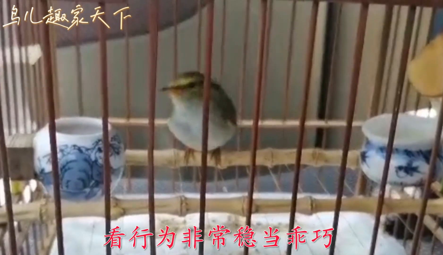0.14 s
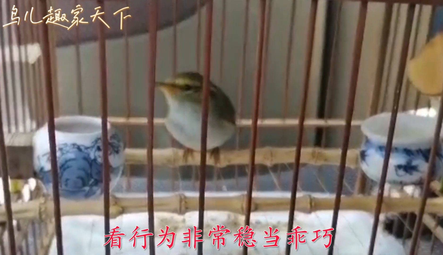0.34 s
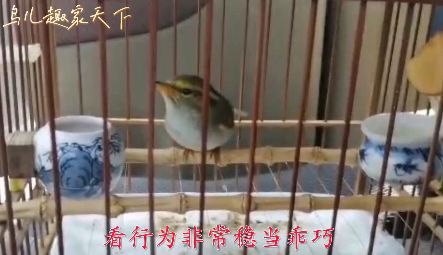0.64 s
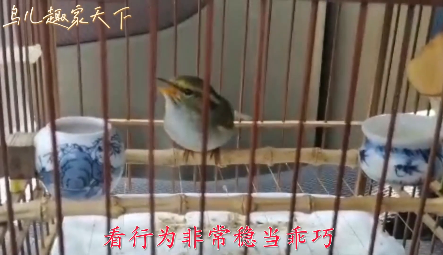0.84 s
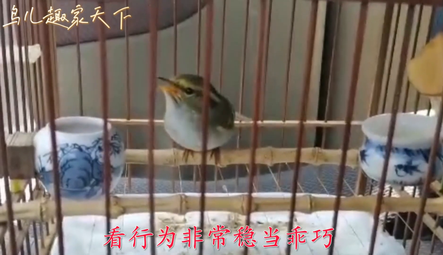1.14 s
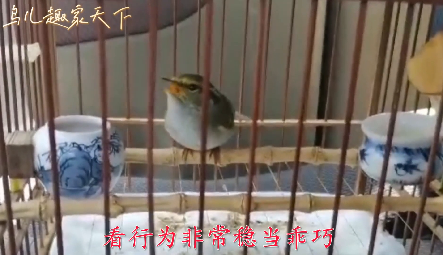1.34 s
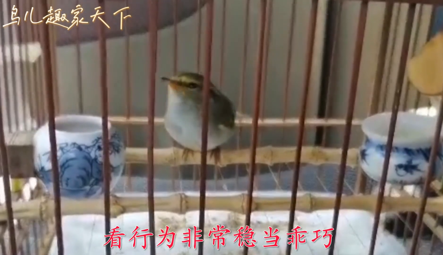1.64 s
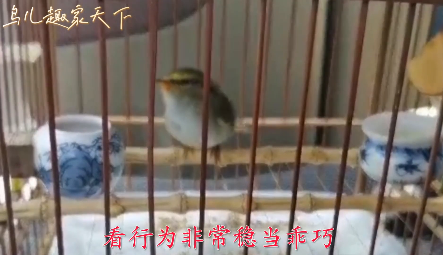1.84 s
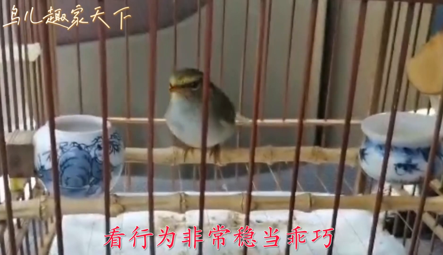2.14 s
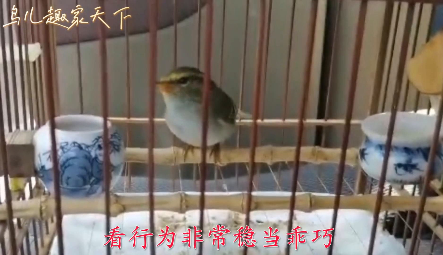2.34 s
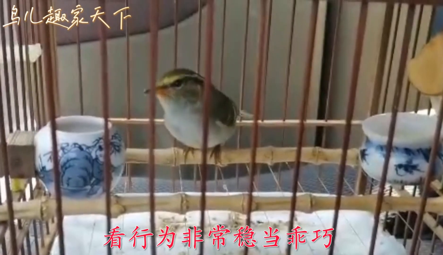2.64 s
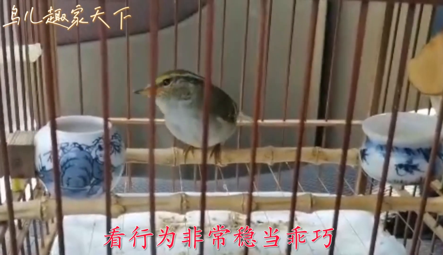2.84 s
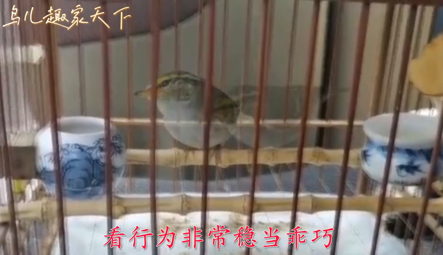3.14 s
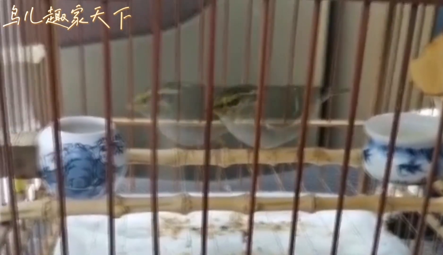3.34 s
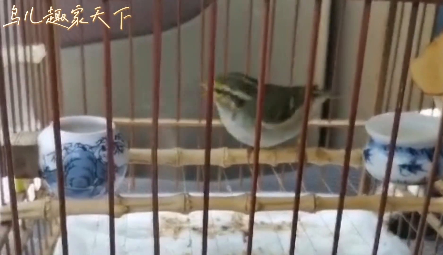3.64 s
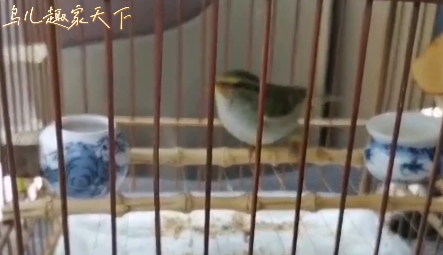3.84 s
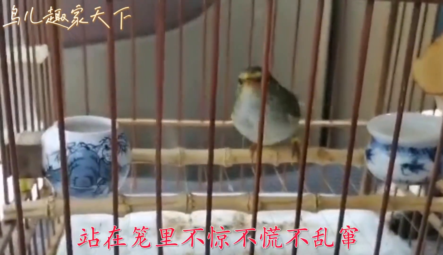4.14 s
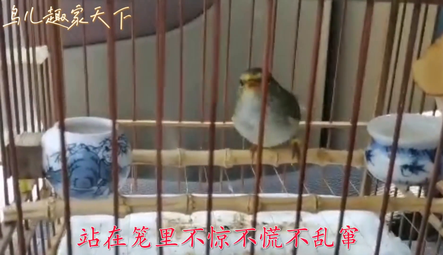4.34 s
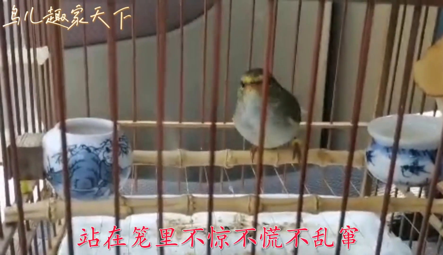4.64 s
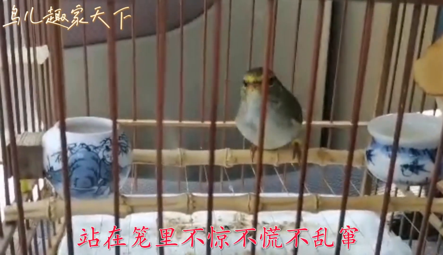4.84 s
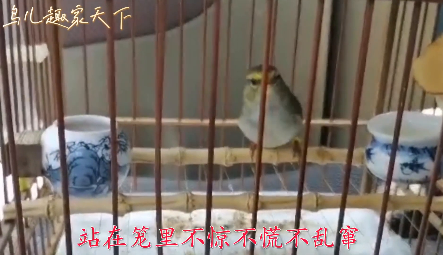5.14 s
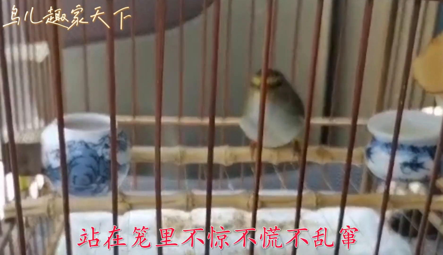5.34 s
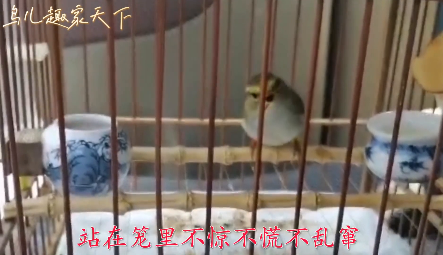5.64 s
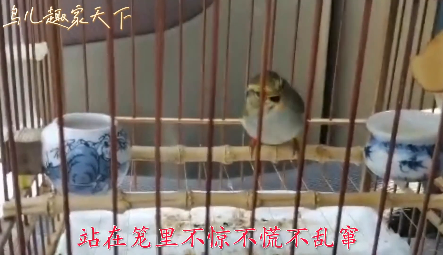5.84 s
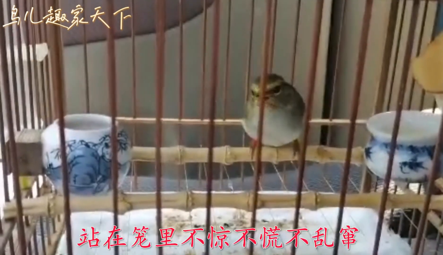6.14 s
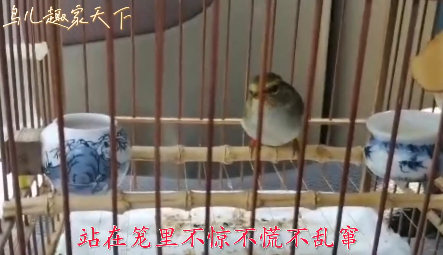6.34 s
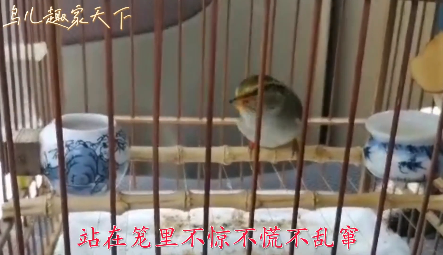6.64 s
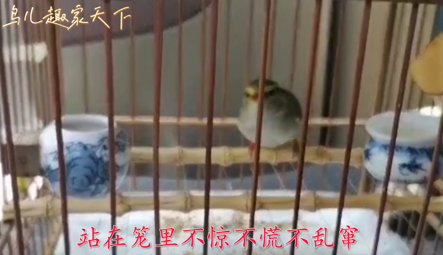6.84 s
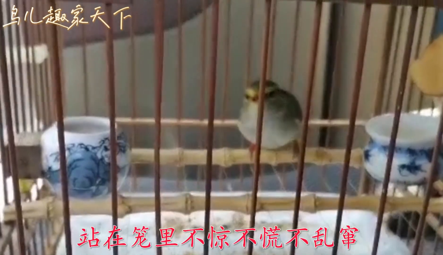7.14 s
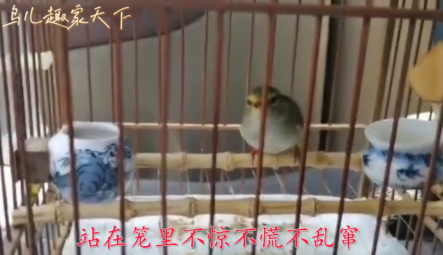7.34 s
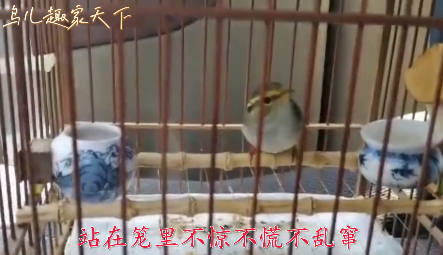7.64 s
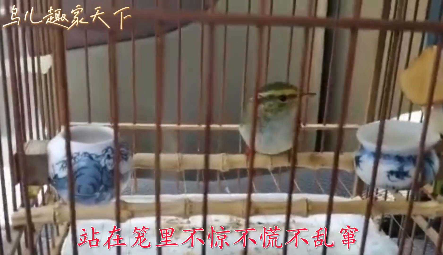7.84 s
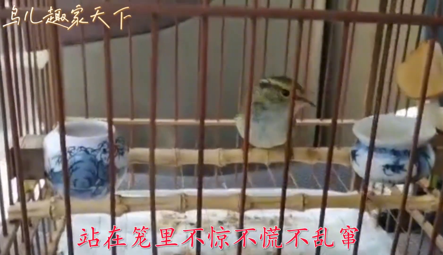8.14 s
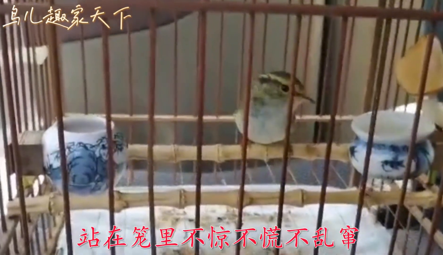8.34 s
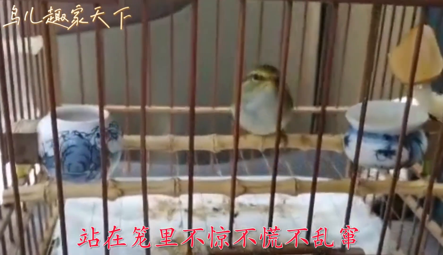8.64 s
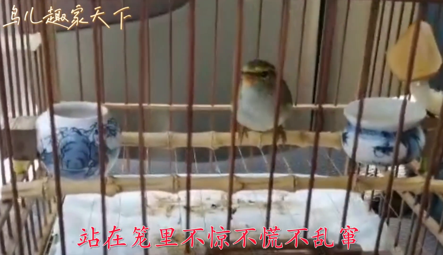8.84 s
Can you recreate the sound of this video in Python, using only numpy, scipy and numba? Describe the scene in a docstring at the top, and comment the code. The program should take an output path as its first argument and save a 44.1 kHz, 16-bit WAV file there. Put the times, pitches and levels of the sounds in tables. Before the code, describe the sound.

Fast high chirping trills and swooping whistles from a little bird, four hard raps on bamboo, a breathy burst of street noise, then final warbles.

```python
"""Caged warbler in a small room

A small warbler sings whistled phrases in a bamboo cage, close to a phone with two microphone ports.
Each note is a gliding near sine with a faint octave and breath; beak raps ring decaying perch modes.
Cage and wall return short noise-like echoes. Behind lie shaped noises: room rumble, street swells
outside the window, a breathy drone and tyre hiss. The phone's suppressor turns them down under the song.
"""
import sys
import numpy as np
from scipy import signal
from scipy.fft import rfft, irfft
from scipy.io import wavfile
from scipy.ndimage import uniform_filter1d
from numba import njit

SR = 44100
rng = np.random.default_rng(int(sys.argv[2]) if len(sys.argv) > 2 else 0)


def to_wav(sig):
    """Store sig (one row per channel, or 1-D mono) as 16-bit WAV at the path in sys.argv[1].

    Samples outside -1..1 are clipped; the rate is SR.
    """
    pcm = np.clip(np.atleast_2d(sig), -1, 1) * 32767
    pcm = np.round(pcm).astype(np.int16)
    wavfile.write(sys.argv[1], SR, pcm.T)  # frames by channels


N = 396900  # 9 s

# voice: octave, the octave's breath and the whistle's breath, against the whistle
OCTAVE_DB, OCTAVE_BREATH_DB, BREATH_DB = -35, -35, -27
BREATH_HZ = 500  # the breath widens the whistle by about this much on each side
WOBBLE = .012  # random pitch tremble, as a share of the pitch
FLUTTER_DB = 2  # quick unsteadiness of the voice's level
# the glide reaches this far before the first mark and past the last one
LEAD_S, RUN_ON_S = .0035, .01
RUN_ON_SHARE = .52  # share of the last glide's speed kept while the note dies

# room and microphone
ECHO_T60_S, ECHO_DB = .049, -4.5  # close echoes
LATE_T60_S, LATE_DB = .12, -16.5  # later tail
WALL_HZ = 6500  # the walls swallow sound above this
PORT_LAG_S = .00019  # the right port is further from the cage
SHADOW_HZ, SHADOW_DB = 7220, -23.5  # the phone's body shades the right port's treble
DUCK_FROM_DB, DUCK_SLOPE, DUCK_RELEASE_S = -34.5, .53, .06  # slope: dB down per dB over the threshold
CEILING = .93  # full scale is 1
SHELF_HZ, SHELF_DB, TOP_HZ = 9600, -19, 15300

# Notes with three marks (start, turn, end). Columns of the five tables below:
# start_s, turn_s, end_s, start_hz, turn_hz, end_hz, start_db, turn_db, end_db
# quick trill notes that dive and spring back
DIPS = [(0.3632, 0.3870, 0.3980, 7300, 4780, 5780, -17.5, -15, -12),
        (0.4336, 0.4585, 0.4710, 7210, 4350, 5420, -12.5, -11, -9.5),
        (0.5039, 0.5300, 0.5455, 7230, 4360, 6200, -15, -11.5, -15),
        (0.5761, 0.6055, 0.6215, 7400, 4130, 6150, -8, -18, -12),
        (0.6502, 0.6810, 0.6975, 7500, 3970, 6100, -8.5, -13, -13.5),
        (0.7293, 0.7586, 0.7870, 7790, 4010, 6730, -7, -20.5, -12),
        (0.8145, 0.8417, 0.8540, 7330, 3860, 5500, -9.5, -23, -16.5),
        (0.8896, 0.9150, 0.9295, 7710, 3630, 5730, -9.5, -22.5, -13),
        (0.9629, 0.9915, 1.0065, 7720, 4020, 6150, -11, -17, -16),
        (1.0453, 1.0735, 1.0900, 7760, 4140, 6180, -10, -19.5, -19),
        (1.1302, 1.1541, 1.1719, 7500, 3910, 5630, -10, -17.5, -19.5),
        (1.2045, 1.2325, 1.2539, 7600, 3500, 7260, -7.5, -28.5, -10),
        (1.2956, 1.3228, 1.3400, 7850, 4050, 5900, -14, -16.5, -14.5),
        (1.3834, 1.4070, 1.4237, 7480, 4290, 4950, -20, -14, -19)]
# slow, loud notes that sink and climb
SCOOPS = [(1.7212, 1.7789, 1.8054, 5030, 3720, 4550, -17.5, -7.5, -11.5),
          (2.0307, 2.0807, 2.1330, 6180, 3730, 5000, -17, -7, -10.5),
          (2.3369, 2.3793, 2.4432, 5440, 3594, 4850, -14.5, -8.5, -10.5)]
# upward slides
RISES = [(1.6243, 1.6515, 1.6628, 3030, 3680, 5140, -27, -4.5, -12),
         (1.9291, 1.9563, 1.9650, 2770, 3930, 5570, -17.5, -10.5, -13.5),
         (2.2255, 2.2560, 2.2694, 2798, 3983, 5340, -20, -2, -12),
         (5.2764, 5.2880, 5.2960, 3060, 3250, 3430, -30.5, -14.5, -16),
         (6.2250, 6.2300, 6.2360, 4820, 5550, 6000, -26, -23, -35)]
# a flick up, then a longer fall
CRESTS = [(3.7380, 3.7413, 3.7769, 6130, 6500, 3370, -27, -20.5, -5.5),
          (3.8454, 3.8574, 3.9039, 4600, 6250, 3610, -19.5, -19, -9.5),
          (3.9503, 3.9612, 4.0018, 3400, 6100, 2750, -14.5, -13.5, -19),
          (4.0461, 4.0570, 4.0969, 3180, 6453, 3220, -15, -15.5, -12),
          (4.1502, 4.1611, 4.2043, 3360, 6490, 3590, -15.5, -12, -11.5),
          (4.3516, 4.3624, 4.4042, 3200, 6170, 3045, -11.5, -11, -11.5),
          (4.4626, 4.4735, 4.5199, 3440, 6340, 2910, -10.5, -10, -12),
          (4.5827, 4.5980, 4.6346, 3190, 4940, 3249, -17.5, -7, -20)]
# quick trill notes that shoot up and drop
ARCHES = [(5.3449, 5.3645, 5.3809, 4620, 8820, 3230, -13, -22, -20),
          (5.4113, 5.4265, 5.4470, 5770, 8580, 4100, -15.5, -20, -9.5),
          (5.4788, 5.4975, 5.5165, 4650, 7975, 4260, -16.5, -16, -17),
          (5.5480, 5.5665, 5.5870, 4420, 7300, 4200, -20.5, -12.5, -24.5),
          (5.6181, 5.6390, 5.6560, 4920, 8120, 4900, -17, -15, -22.5),
          (5.6885, 5.7070, 5.7238, 5200, 8470, 3950, -13.5, -25.5, -11.5),
          (5.7585, 5.7770, 5.7974, 4620, 8150, 3430, -17, -15, -19.5),
          (5.8344, 5.8550, 5.8751, 4640, 8880, 3480, -22.5, -15, -19.5),
          (5.9106, 5.9340, 5.9520, 4600, 8700, 4570, -20, -15.5, -23),
          (5.9839, 6.0050, 6.0260, 5020, 8860, 4400, -17, -15, -16.5),
          (6.0561, 6.0810, 6.0960, 4800, 10020, 3620, -19, -11.5, -19),
          (6.1341, 6.1580, 6.1750, 4780, 8600, 4370, -21, -18, -23),
          (6.3543, 6.3750, 6.4018, 4660, 5950, 3550, -19.5, -20, -18.5)]

# How each kind bends between its marks, which sit at places 0, 1 and 2. Columns of the five tables:
# time_place [0-2], pitch_place [0-2], offset_db
# bends of the dips
DIP_PATH = [(.48, 0.29, -1), (0.619, .52, -2), (.84, .9, -3), (1.25, 1.14, -0.5), (1.601, 1.75, 1.8),
            (1.8, 1.96, 0.5)]
# bends of the scoops
SCOOP_PATH = [(.45, .55, 5.0), (.8, .9, 1.5), (1.599, 1.5, 1.5)]
# bends of the rises
RISE_PATH = [(.45, 0.31, -1.5), (1.551, 1.52, 0)]
# bends of the crests
CREST_PATH = [(.35, 0.62, 6.0), (.75, .9, -8.5), (1.15, 1.17, -3), (1.35, 1.36, 4), (1.7, 1.68, 0)]
# bends of the arches
ARCH_PATH = [(.45, 0.5, 2.3), (.75, .88, 7.5), (1.35, 1.16, 3.0), (1.55, 1.36, 3.7), (1.75, 1.64, 3.4)]
# notes with a path of their own, one list of turning points each: time_s, pitch_hz, level_db
WARBLES = [
    [(1.336, 5000, -16.5), (1.343, 3680, -26), (1.348, 2950, -28.5)],
    [(2.5440, 5300, -40.5), (2.5515, 4300, -19), (2.5560, 5070, -41)],
    [(2.5451, 2504, -18), (2.5527, 2165, -18.5), (2.5647, 3420, -9), (2.5789, 4070, -2.5),
     (2.5876, 4260, -41), (2.5941, 5300, -6), (2.6061, 3090, -7)],
    [(4.2482, 3331, -26), (4.2525, 5000, -7.5), (4.258, 5940, -18), (4.264, 5420, -14), (4.2765, 5250, -9),
     (4.292, 4220, -13), (4.3008, 3230, -15.5)],
    [(4.697, 6140, -15), (4.7111, 4350, -8), (4.7370, 3570, -35), (4.7480, 3510, -18), (4.7560, 3270, -22),
     (4.7640, 3260, -10.5), (4.7730, 3355, -23.5), (4.7850, 3310, -15)],
    [(4.8446, 5800, -17.5), (4.8522, 4800, -7), (4.8631, 4070, -17.5), (4.8850, 3780, -13.5),
     (4.9000, 3420, -24), (4.9165, 3234, -12), (4.9397, 3296, -29.5)],
    [(4.9807, 5080, -15), (4.9905, 5380, -18), (4.997, 4910, -8), (5.0264, 3550, -25.5),
     (5.0480, 3470, -20), (5.0600, 3700, -13), (5.0740, 3484, -16)],
    [(5.1352, 3920, -17.5), (5.1410, 4650, -10), (5.1592, 4936, -6), (5.1660, 4460, -26.5),
     (5.1897, 3830, -24.5)],
    [(5.3025, 8400, -25.5), (5.3072, 7400, -28.5), (5.3116, 4800, -17), (5.314, 4270, -31)],
    [(6.4203, 3220, -28.5), (6.4377, 3520, -20), (6.4600, 3480, -22), (6.4680, 3250, -19.5),
     (6.4760, 3270, -31), (6.4830, 3330, -18.5), (6.4932, 3240, -16.5), (6.502, 4720, -14.5)],
    [(6.5687, 5200, -13), (6.5780, 6310, -9), (6.5948, 5380, -13.5), (6.6100, 3160, -26.5),
     (6.6275, 4440, -8.5), (6.6503, 3194, -20), (6.6688, 3980, -17), (6.6841, 3350, -14.5)],
    [(8.4154, 3540, -33), (8.4285, 4280, -12.5), (8.4426, 5396, -14), (8.4610, 3460, -20.5),
     (8.4785, 5100, -12), (8.496, 3455, -20), (8.5264, 4860, -10)],
    [(8.6378, 3255, -29.5), (8.6585, 4590, -9.5), (8.6685, 5550, -15), (8.6900, 3150, -20.5),
     (8.7070, 5085, -6), (8.7250, 4190, -20.5), (8.7496, 4680, -17.5)],
    [(8.8272, 2460, -18), (8.8348, 3850, -15), (8.8550, 5170, -6.5), (8.8690, 3994, -14.5),
     (8.8860, 4710, -11), (8.899, 3290, -29), (8.9099, 2686, -16), (8.9170, 3280, -31),
     (8.9230, 3950, -16.5), (8.9361, 4300, -6)],
]
# pitches that throat and beak favour: pitch_hz, gain_db
THROAT_GAIN = [(2500, 4), (3500, -3), (4300, -1.57), (4900, 0.5), (5800, -3.5), (6600, 2), (7400, 1.5),
               (8300, -4.5), (9300, -16)]
# the bird turns its head: time_s, left_minus_right_db
FACING = [(0.4, 0.7), (1.4, 2), (1.65, -5), (2.6, -3.0), (3.8, -1.5), (5.2, -2.5), (5.5, -0.5), (6.5, -2),
          (8.5, 0)]

# beak on bamboo: start_s, level_db (before a common trim)
RAPS = [(2.8757, -30.5), (3.03, -3.5), (3.2147, -7), (3.4056, -4), (3.677, -49)]
# ringing modes of the perch: pitch_hz, level_db (before each rap's random change), t60_s
PERCH_MODES = [(340, -14, 0.032), (752, -25, 0.13), (1270, -67.5, .04), (1720, 2.5, 0.023),
               (1890, -10, 0.052), (2350, -6, 0.027), (3050, -3.5, 0.013), (5000, -22, 0.051),
               (8500, -9.5, 0.046)]

# spectrum of the room's rumble: pitch_hz, density_db (relative, per Hz)
RUMBLE_SPECTRUM = [(14, -28.5), (26, 5.5), (45, -14), (71, -14), (95, -18), (125, -22.5), (160, -14.5),
                   (222, -25.5), (306, -25), (420, -33), (601, -45), (3170, -49), (4540, -77.5),
                   (9050, -73)]
# spectrum of the street noise: pitch_hz, density_db (relative, per Hz)
STREET_SPECTRUM = [(150, -21), (300, -2.5), (430, 1), (580, -9), (700, -1.5), (850, -5.5), (1050, -1),
                   (1500, -8), (2400, -7.5), (4000, -27.5), (9000, -39)]
# background ahead of the suppressor and port balance: time_s, rumble_db, street_db
SWELL = [(0, -30.5, -52.5), (0.351, -23, -53.5), (0.601, -42, -54), (1.25, -45, -60), (1.45, -32.5, -48.5),
         (1.65, -24.5, -48.5), (2.001, -24, -54.5), (2.55, -25.5, -68), (2.801, -24, -55.5),
         (3.752, -30.5, -42.5), (4.3, -37, -44.5), (4.8, -34.5, -58), (5.15, -41.5, -64), (5.302, -20, -52),
         (5.799, -44, -55), (6.25, -21, -44.5), (6.548, -15, -22), (6.751, -20.5, -38.5), (7.3, -20.5, -34),
         (7.65, -31, -47.5), (8.399, -30.5, -44.5), (9, -35.5, -46)]
# breathy drone outside that comes and goes: time_s, centre_hz, level_db, broad_share [0-1]
DRONE_PATH = [(3.381, 900, -85.5, .1), (3.45, 957, -43, 0), (3.7, 1033, -47.5, 0), (3.8, 1062, -39.5, 0.53),
              (4.2, 1029, -69, 1), (6.701, 1044, -62, 0.3), (7.299, 1043, -32, 0.2),
              (7.6, 1096, -35.5, 0.77), (7.68, 1052, -46.5, 0.57), (8.4, 1051, -48.5, 0.59)]
# widths of the drone's two noise bands: narrow_hz, broad_hz
DRONE_WIDTHS = (130, 930)
# tyre hiss in the treble: time_s, level_db
HISS_LEVEL = [(3.299, -61), (3.701, -47.5), (4.1, -37), (4.603, -67.5), (6.1, -59), (6.502, -28),
              (6.701, -56.5), (7.1, -52), (7.5, -80.5)]


def undb(db):
    """Amplitude factor of a level in dB."""
    return 10 ** (np.asarray(db) / 20)


def level(x, db):
    """Bring x to an RMS level in dB of full scale."""
    return x * undb(db) / np.sqrt(np.mean(x ** 2))


def shape(x, gain):
    """Weigh every frequency by gain(Hz)."""
    return irfft(rfft(x) * gain(np.fft.rfftfreq(x.shape[-1], 1 / SR) + 1e-3), x.shape[-1])


def over_time(table):
    """Draw each column of a time table as a line through the whole scene."""
    s, *columns = np.transpose(table)
    return [np.interp(np.arange(N) / SR, s, column) for column in columns]


def walk(rate):
    """Random levels held 1 / rate s and slewed twice; spread near 1."""
    k = int(SR / rate)
    steps = np.repeat(rng.standard_normal(N // k + 1), k)
    return 1.1 * uniform_filter1d(uniform_filter1d(steps, k), k)[:N]


def warbler():
    """Each note is a gliding near sine from the syrinx, with a faint octave and a little breath."""
    out, lead = np.zeros(N), int(LEAD_S * SR)
    breath = shape(rng.standard_normal(N), lambda f: 1 / (1 + (f / BREATH_HZ) ** 4))
    breath = level(breath, BREATH_DB)
    patchy = undb(5 * walk(50))  # the octave comes and goes
    wobble = 1 + WOBBLE * walk(120)
    flutter_db = FLUTTER_DB * walk(250)
    octave = undb(OCTAVE_DB) + undb(OCTAVE_BREATH_DB - BREATH_DB) * breath
    for s, hz, db in notes():
        i = np.arange(int(s[0] * SR) - lead, min(int((s[-1] + RUN_ON_S) * SR), N))
        # the glide runs on while the syrinx starts and stops
        slope = np.diff(hz) / np.diff(s)
        first_hz = hz[0] - slope[0] * LEAD_S
        last_hz = max(hz[-1] + RUN_ON_SHARE * slope[-1] * RUN_ON_S, 1500)
        path_s = np.r_[s[0] - LEAD_S, s, s[-1] + RUN_ON_S]
        pitch = np.interp(i / SR, path_s, np.r_[first_hz, hz, last_hz])
        for _ in range(2):  # muscles round the corners of the pitch path
            pitch = uniform_filter1d(pitch, size=120, mode="nearest")
        phase = 2 * np.pi * np.cumsum(pitch * wobble[i]) / SR
        tone = (1 + breath[i]) * np.sin(phase) + patchy[i] * octave[i] * np.sin(2 * phase)
        fade_in = (i - i[0]) / (1.155 * lead)
        fade_out = (i[-1] - i) / (1.517 * RUN_ON_S * SR)
        fade = np.clip(np.minimum(fade_in, fade_out), 0, 1) ** 3
        throat_db = np.interp(pitch, *np.transpose(THROAT_GAIN))
        note_db = flutter_db[i] + np.interp(i / SR, s, db) + throat_db
        out[i] += np.sqrt(2) * undb(note_db) * fade * tone
    return out


def notes():
    """Give every note as times, pitches and levels: each kind stretches its path over its rows."""
    kinds = ((DIPS, DIP_PATH), (SCOOPS, SCOOP_PATH), (RISES, RISE_PATH),
             (CRESTS, CREST_PATH), (ARCHES, ARCH_PATH))
    places = np.arange(3)
    for rows, path in kinds:
        bends = sorted(list(path) + [(p, p, 0) for p in places])
        when, pitch, offset_db = np.transpose(bends)
        for s, hz, marks_db in np.reshape(rows, (-1, 3, 3)):
            db = offset_db + np.interp(when, places, marks_db)
            yield np.interp(when, places, s), np.interp(pitch, places, hz), db
    yield from map(np.transpose, WARBLES)


def raps():
    """Each rap rings the perch modes with its own weights, with a short noise crack on top."""
    out, t = np.zeros(N), np.arange(int(SR / 5)) / SR
    chance = rng.standard_normal((len(RAPS), len(PERCH_MODES)))
    for (s, rap_db), weights in zip(RAPS, chance):
        ring = np.zeros(len(t))
        for (hz, db, t60), weight in zip(PERCH_MODES, weights):
            ring += undb(db + 2.9 * weight) * np.sin(2 * np.pi * hz * t) * 1000. ** (-t / t60)
        crack = shape(rng.standard_normal(len(t)), lambda f: f / (f + 500) / (1 + f / 1500))
        crack = level(crack, -6) * 1000. ** (-t / .031)
        i = int(s * SR)
        out[i:i + len(t)] += undb(rap_db - 7.5) * (ring + crack)
    return out


def room(x):
    """Close echoes from cage and wall, then a faint later tail; each port hears its own."""
    t = np.arange(int(SR / 2)) / SR
    tails = rng.standard_normal((2, 2, len(t))) * np.clip(t / .004, 0, 1)
    response = 0
    for tail, t60, db in zip(tails, (ECHO_T60_S, LATE_T60_S), (ECHO_DB, LATE_DB)):
        tail = tail * 1000. ** (-t / t60)
        response = response + undb(db) * tail / np.sqrt(np.sum(tail ** 2, axis=1, keepdims=True))
    # soft walls swallow the top
    response = shape(response, lambda f: 1 / np.sqrt(1 + (f / WALL_HZ) ** 4))
    return signal.fftconvolve(x[None], response, axes=1)[:, :N]


def murk(spectrum, db, alike_hz, flicker_db):
    """Rumble or street noise: octave bands flicker alone, and both ports hear nearly the same bass."""
    hz, density_db = np.transpose(spectrum)
    f = np.fft.rfftfreq(N, 1 / SR) + 1e-3
    colour = undb(np.interp(np.log(f), np.log(hz), density_db))
    mid, side = rfft(rng.standard_normal((2, N))) * colour
    # long waves reach both ports alike, so the difference fades below alike_hz
    both = mid + side * np.array([[1], [-1]]) / np.sqrt(1 + (alike_hz / f) ** 2)
    out = 0
    for centre in np.arange(4, 14.5):  # band centres, as powers of two in Hz
        band = np.cos(np.pi / 2 * np.clip(np.log2(f) - centre, -1, 1)) ** 2
        out = out + irfft(both * band, N) * undb(flicker_db * walk(9))
    return level(out, 0) * undb(db)


def drone():
    """A narrow and a broad noise band around one drifting centre: slow noises sway two carriers."""
    hz, db, broad = over_time(DRONE_PATH)
    broad = np.clip(broad, 0, 1)
    phase = 2 * np.pi * np.cumsum(hz) / SR
    out = 0
    for width, share in zip(DRONE_WIDTHS, (1 - broad, broad)):
        sway = shape(rng.standard_normal((2, N)), lambda f: 1 / (1 + (2 * f / width) ** 4))
        band = sway[0] * np.cos(phase) + sway[1] * np.sin(phase)
        out = out + np.sqrt(share) * level(band, 0)
    return out * undb(db)


def hiss():
    """Tyre hiss as smooth treble noise, unrelated at the two ports."""
    noise = shape(rng.standard_normal((2, N)),
                  lambda f: 1 / (1 + (2500 / f) ** 4) / (1 + (f / 6000) ** 2))
    return level(noise, 0) * undb(over_time(HISS_LEVEL)[0])


@njit
def follow(x, fall):
    """Peak follower: jumps up at once, sinks slowly."""
    y, e = np.empty(len(x)), 0.
    for i in range(len(x)):
        e = max(abs(x[i]), e * fall)
        y[i] = e
    return y


def suppressor(song):
    """Gain on the background: down by a share of what the song tops a threshold by."""
    peak = follow(song, np.exp(-1 / (DUCK_RELEASE_S * SR)))
    loud_db = 20 * np.log10(peak + 1e-9)
    duck_db = DUCK_SLOPE * np.minimum(DUCK_FROM_DB - loud_db, 0)
    return undb(uniform_filter1d(duck_db, size=1500))


def scene():
    """Set bird, raps, room and background before the phone's two ports, left and right."""
    song, knocks = warbler(), raps()
    late_song = shape(song, lambda f: np.exp(-2j * np.pi * f * PORT_LAG_S))
    facing_db, = over_time(FACING)
    near = np.array([song, late_song]) * undb(np.array([facing_db, -facing_db]) / 2)
    near = near + knocks * undb([[-1.2], [1.2]])  # the raps lean right
    rumble_db, street_db = over_time(SWELL)
    background = murk(RUMBLE_SPECTRUM, rumble_db, 900, 2.86)
    background = background + murk(STREET_SPECTRUM, street_db, 830, 1.5) + drone() + hiss()
    background *= undb([[.8], [-.8]])  # the background leans left
    left, right = near + room(song + knocks) + background * suppressor(song)
    shaded = shape(right, lambda f: undb(SHADOW_DB / (1 + (SHADOW_HZ / f) ** 12)))
    return np.array([left, shaded])


def record(dry):
    """The microphone rounds the loudest peaks, drops above a shelf and cuts the top."""
    held = CEILING * dry / (CEILING ** 6 + dry ** 6) ** (1 / 6)
    shelved = shape(held, lambda f: undb(SHELF_DB / (1 + (SHELF_HZ / f) ** 40)))
    return signal.sosfilt(signal.ellip(8, .2, 70, TOP_HZ, fs=SR, output="sos"), shelved)


dry = scene()
out = record(dry)
to_wav(out)
```